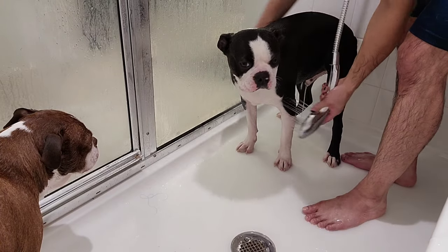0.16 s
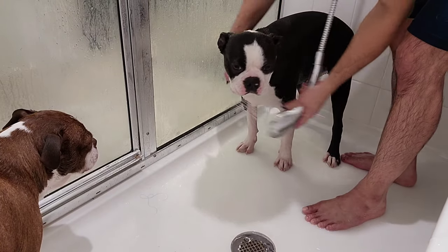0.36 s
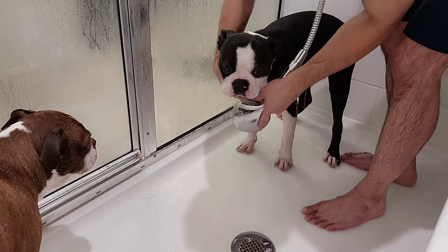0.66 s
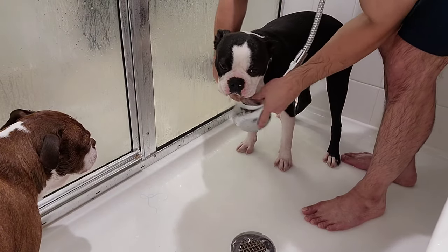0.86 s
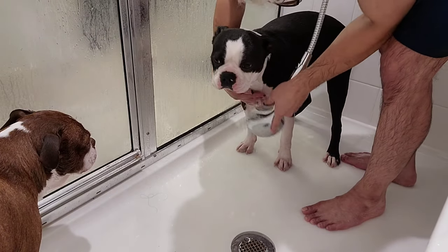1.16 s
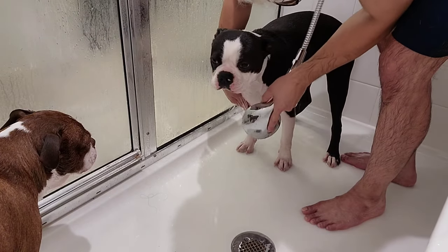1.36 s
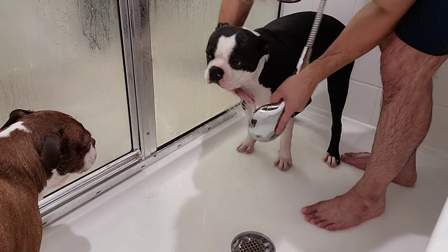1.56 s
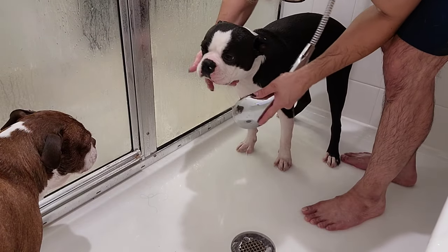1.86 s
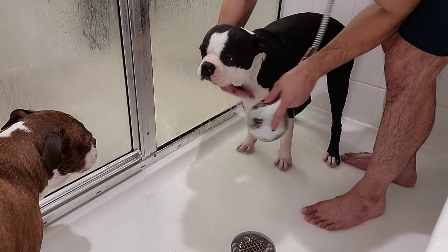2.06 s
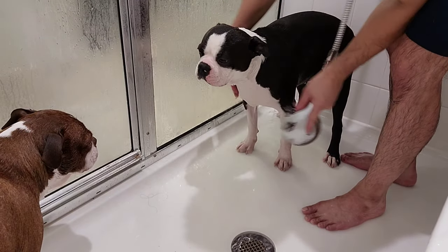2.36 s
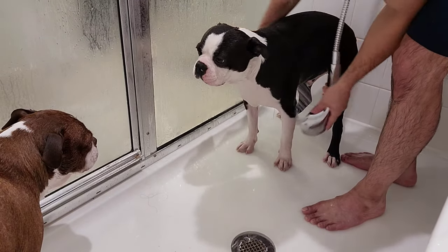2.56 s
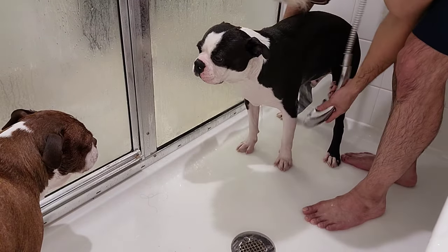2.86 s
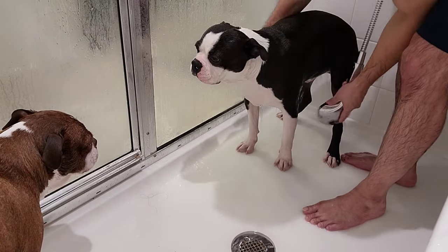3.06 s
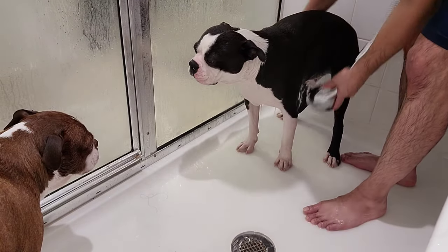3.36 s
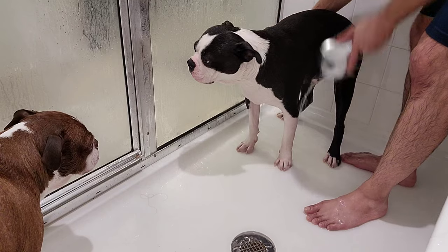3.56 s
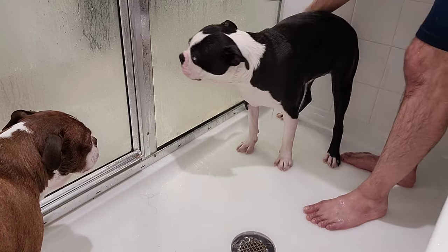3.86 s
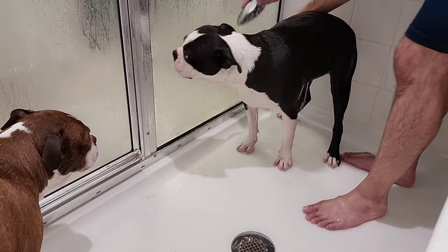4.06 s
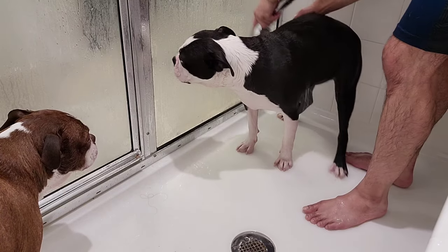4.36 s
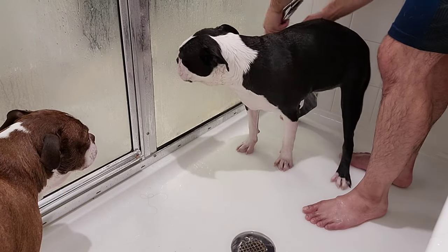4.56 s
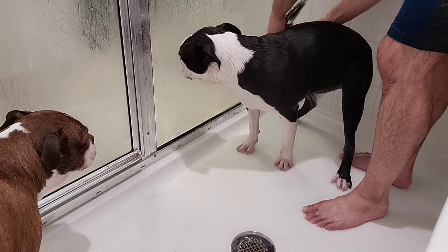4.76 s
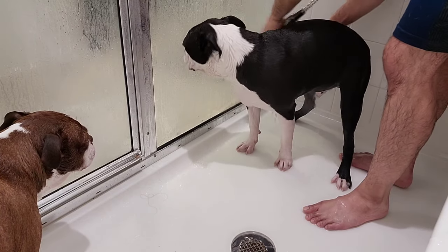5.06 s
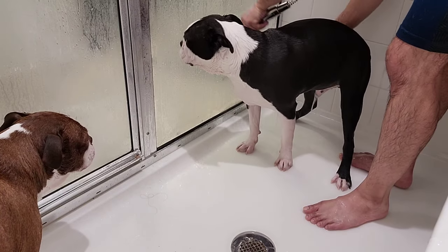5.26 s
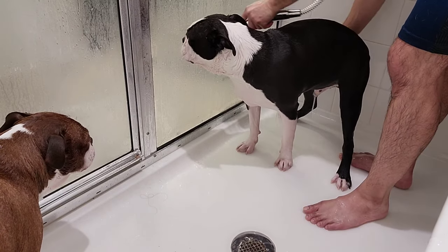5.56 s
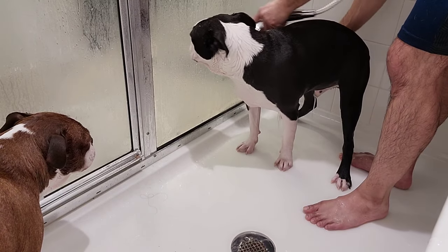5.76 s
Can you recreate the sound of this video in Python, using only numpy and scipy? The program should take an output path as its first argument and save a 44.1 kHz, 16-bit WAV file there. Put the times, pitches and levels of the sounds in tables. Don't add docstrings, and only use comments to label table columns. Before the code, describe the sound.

In a small tiled shower stall, a hand shower hisses continuously and splashes on a dog's coat, its tone shifting as it moves. Early gushes gurgle and ring at the drain. Midway, paws thud on the hollow tray; near the end a hard knock booms and rattles the door frame. Close stereo pickup, wide airy treble.

```python
import sys
import numpy as np
from scipy import signal
from scipy.io import wavfile
from scipy.ndimage import uniform_filter1d

SR = 44100
rng = np.random.default_rng(int(sys.argv[2]) if len(sys.argv) > 2 else 0)


def bounce(signal):
    frames = np.transpose(np.atleast_2d(signal))
    limited = np.clip(frames, -1, 1)
    pcm = np.round(limited * 32767).astype(np.int16)
    wavfile.write(sys.argv[1], SR, pcm)


def undo_db(level):
    steps = np.asarray(level, float) / 20
    return 10 ** steps


N = 261292

LEFT_DB, LEFT_BASS_DB = 1.3, 2.2
RIGHT_LAG_S = -.0001
STALL_T60_S, SHARED_BELOW_HZ = .34, 215


def rms_one(x):
    return x / np.sqrt(np.mean(x ** 2) + 1e-20)


def in_time(rows):
    s, *columns = np.transpose(rows)
    return [np.interp(np.arange(N) / SR, s, c) for c in columns]


def swells(rows):
    s, half_s = np.array(rows)[:, :2].T[..., None]
    t = np.arange(0, N, 32) / SR
    return np.cos(np.pi / 2 * np.clip((t - s) / half_s, -1, 1)) ** 2


def summed(rows, column):
    total = np.asarray(column) @ swells(rows)
    return np.interp(np.arange(N) / 32, np.arange(len(total)), total)


def drift(rate_hz):
    r = np.exp(-80 * np.pi * rate_hz / SR)
    noise = rng.standard_normal(N // 40 + 2002)
    slow = signal.lfilter([1], [1, -2 * r, r * r], noise)[2000:]
    return np.interp(np.arange(N) / 40, np.arange(len(slow)), rms_one(slow))


def resonate(x, hz, width_hz):
    r = np.exp(-np.pi * width_hz / SR)
    poles = [1, -2 * r * np.cos(2 * np.pi * hz / SR), r * r]
    return signal.lfilter([(1 - r * r) / 2, 0, (r * r - 1) / 2], poles, x + 1e-18)


def body(x, modes):
    out = 0
    for k, (hz, width_hz, db) in enumerate(modes):
        out = out + (-1) ** k * undo_db(db) * resonate(x, hz, width_hz)
    return out


def ring(clicks, hz, t60):
    r, w = undo_db(-60 / (t60 * SR)), 2 * np.pi * hz / SR
    return signal.lfilter([0, np.sin(w)], [1, -2 * r * np.cos(w), r * r], clicks + 1e-18)


def soften(x, cut_hz):
    r = np.exp(-2 * np.pi * cut_hz / SR)
    return signal.lfilter([(1 - r) ** 2], [1, -2 * r, r * r], x)


def droplets(per_s, spread_db, channels=1):
    size_db = spread_db * np.minimum(rng.exponential(1, (channels, N)), 5)
    sizes = undo_db(size_db) * rng.choice([-1, 1], (channels, N))
    return rms_one(sizes * (rng.random((channels, N)) < per_s / SR))


def burst(s, length_s, rise_s):
    t = np.arange(8000) / SR
    envelope = (1 - np.exp(-t / rise_s)) * np.exp(-t / length_s)
    return round(s * SR), rng.standard_normal(len(t)) * envelope


def add(track, at, sound):
    track[at:at + len(sound)] += sound[:N - at]


def echoes(x):
    t = np.arange(SR // 2) / SR
    tail = rng.standard_normal((2, len(t))) * undo_db(-60 * t / STALL_T60_S) * (t > .002)
    tail = signal.sosfilt(signal.butter(5, SHARED_BELOW_HZ, "high", fs=SR, output="sos"), tail)
    tail /= np.sqrt(np.sum(tail ** 2, axis=1, keepdims=True))
    return signal.fftconvolve(x[None], tail, axes=1)[:, :N]


def stall(x, wet_db, place=0):
    bass = signal.sosfilt(signal.butter(4, SHARED_BELOW_HZ, fs=SR, output="sos"), x)
    bass = bass * undo_db(np.array([[LEFT_BASS_DB - LEFT_DB], [LEFT_DB - LEFT_BASS_DB]]) / 2)
    treble = signal.sosfilt(signal.butter(4, SHARED_BELOW_HZ, "high", fs=SR, output="sos"), x)
    treble = np.array([treble, np.roll(treble, round(RIGHT_LAG_S * SR))])
    wet = echoes(x * np.cos(place))
    if np.any(place):
        wet = wet + echoes(x * np.sin(place))
    return bass + (treble + undo_db(wet_db) * wet) / np.sqrt(1 + undo_db(2 * wet_db))


# pitch_hz, width_hz, level_db
TRAY_MODES = [(38, 8.9, 0.5), (70, 13, 1.5), (135, 45, 0.5), (209.1, 13.4, 2.5), (275.7, 39.5, 1),
              (207, 17, -9), (364, 8, -4.5)]


def drumming():
    level_db = -55 + 4.0 + 1.0 * drift(25.0)
    return rms_one(body(droplets(900, spread_db=3.0)[0], TRAY_MODES)) * undo_db(level_db)


# pitch_hz, width_hz, level_db
FILM_MODES = [(378.5, 8.4, 0), (504, 64, -19), (746, 150, -4.5), (952, 21, 0), (1075, 290, -7)]
# peak_s, half_length_s, gurgle_lift_db, drain_lift_db
GUSHES = [(0.18, 0.3, 3.5, 6.5), (0.422, 0.15, 11.5, 16), (0.633, 0.2, 7, 21.5), (0.827, 0.03, 7, 12),
          (1.004, 0.032, -2, 18), (2.003, 0.056, 5.5, 15), (2.44, 0.087, 2, 9), (2.742, 0.33, 3.5, 8),
          (3.855, 0.097, 1, 15), (4.224, 0.037, 9.5, -13), (4.44, 0.22, 9, 5), (5.805, 0.23, 6, -4.5)]
GURGLE_DB, DRAIN_DB = -60.5, -70.5


def runoff():
    gurgle_lift_db, drain_lift_db = np.array(GUSHES)[:, 2:].T
    gurgle_db = GURGLE_DB + summed(GUSHES, gurgle_lift_db) + 3.5 + 1.2 * drift(9.6)
    drain_db = DRAIN_DB + summed(GUSHES, drain_lift_db) + 1.5
    gurgle = rms_one(body(droplets(1200, spread_db=4.0)[0], FILM_MODES)) * undo_db(gurgle_db)
    drain = resonate(resonate(droplets(800, spread_db=5.5)[0], 582, 17), 553, 8.7)
    drain = drain / np.sqrt(uniform_filter1d(drain ** 2, size=2500) + 1e-20)
    return gurgle, drain * undo_db(drain_db)


# start_s, length_s, level_db, pitch_hz
AIR_POCKETS = [(.41, 0.016, -39, 1120), (0.443, .04, -43, 2930), (0.549, 0.114, -41, 1417),
               (0.582, 0.06, -46, 1130), (.65, 0.042, -53, 2170), (.69, 0.047, -46, 2330),
               (.73, 0.15, -50, 2760), (1.06, 0.015, -51, 2410), (1.347, 0.077, -40.5, 2690),
               (1.905, 0.13, -48, 2250), (3.845, 0.017, -43, 1740), (4.238, 0.059, -47, 1420)]


def pockets():
    out = np.zeros(N)
    for s, length_s, db, hz in AIR_POCKETS:
        breath = resonate(rng.standard_normal(8000), hz, 0.079 * hz)
        hum = rms_one(resonate(breath, hz, 0.079 * hz))
        t = np.arange(len(hum)) / SR
        envelope = np.sqrt(np.sin(np.pi * np.clip(t / length_s, 0, 1)).clip(0))
        add(out, round(s * SR), undo_db(db - 4.0) * hum * envelope)
    return out


# start_s, peak_db, centre_hz
FAT_DROPS = [(0.413, -30, 9200), (0.596, -35, 11500), (0.757, -24.5, 12200), (1.0415, -33, 9100),
             (1.6132, -56, 12300), (1.8228, -29.5, 10500), (1.9535, -29.5, 8700), (2.2932, -25.5, 8890),
             (2.415, -23.5, 9600), (4.265, -27, 9450), (4.8005, -30, 12500), (5.097, -46, 11900),
             (5.2, -31, 9600), (5.368, -29, 9700), (5.504, -27.5, 9500), (5.6291, -29, 11900)]


def spats():
    out = np.zeros(N)
    for s, db, hz in FAT_DROPS:
        at, crack = burst(s, .0012, .0002)
        _, fizz = burst(s, 0.0075, 0.00031)
        add(out, at, undo_db(db - 0.5) * resonate(crack + 0.73 * fizz, hz, 0.73 * hz))
    return out


# start_s, pad_db, contact_s, claw_db, claw_hz
PAW_STEPS = [(1.07, -38.5, 0.0086, -35, 2610), (3.64, -28.5, 0.021, -36.5, 1110),
             (3.642, -60, 0.034, -51.5, 3000), (3.661, -19.5, 0.0047, -39, 950),
             (3.684, -28, 0.015, -48, 885), (3.707, -113, 0.051, -48, 785), (3.844, -32.5, 0.043, -46, 650),
             (3.922, -34.5, 0.008, -63, 690), (4.009, -38, 0.054, -64, 496),
             (4.099, -42.5, 0.0085, -62, 500), (4.337, -41, 0.11, -87, 704), (4.457, -45, 0.1, -78, 700),
             (4.546, -39, 0.026, -49, 700), (4.609, -37.5, 0.044, -60, 590),
             (5.502, -43, 0.031, -42.5, 490), (5.548, -56, 0.065, -52, 500)]
# start_s, level_db, pitch_hz, t60_s
WEIGHT_SHIFTS = [(1.07, -40, 150, 0.44), (1.458, -42, 116, 0.21), (3.652, -32.5, 67, 0.2),
                 (3.659, -29, 36.8, 0.3), (3.851, -30, 130, 0.2), (4.014, -32.5, 95, .3),
                 (4.08, -35, 66.7, 0.27), (4.342, -33.5, 135, 0.37), (4.432, -40, 121, 0.22),
                 (4.559, -31.5, 132, 0.11), (4.617, -35, 70, 0.068), (5.505, -38, 45.3, 0.22),
                 (5.55, -32, 38, 0.38), (5.556, -30.5, 139, 0.14)]


def paws():
    pads, claws, bend = np.zeros((3, N))
    for s, pad_db, contact_s, claw_db, claw_hz in PAW_STEPS:
        at, shake = burst(s, contact_s, 0.00031)
        add(pads, at, undo_db(pad_db + 20) * shake)
        at, scratch = burst(s, contact_s * 0.77, 0.00023)
        scratch = resonate(scratch, claw_hz, 0.89 * claw_hz)
        add(claws, at, undo_db(claw_db + 19) * resonate(scratch, claw_hz, 0.89 * claw_hz))
    for s, db, hz, t60 in WEIGHT_SHIFTS:
        add(bend, round(s * SR), undo_db(db) * ring(signal.unit_impulse(SR // 2), hz, t60))
    thud = body(pads, TRAY_MODES[3:]) + undo_db(-9) * body(pads, FILM_MODES[:3])
    return thud + claws + soften(bend, 170)


# start_s, panel_db, frame_db, way (push +1 or pull -1)
BLOWS = [
    (5.355, -22, -68, 1),
    (5.36, -37, -38, -1),
    (5.3665, -5.5, -22.5, 1),
    (5.387, -24.5, -29, 1),
    (5.41, -19, -63, 1),
    (5.441, -21.5, -44, 1),
    (5.476, -22, -43.5, 1),
]
# pitch_hz, level_db, t60_s
PANEL_MODES = [(38, -32, 0.46), (70.8, -19, 0.6), (95, 0.5, 0.069), (124.9, -2.5, 0.6), (163, -21, 0.3),
               (204, -15, 0.43), (283, -13, 0.102), (415, -7, 0.13), (496, 4, 0.095), (537, -4, 0.059)]
# pitch_hz, level_db, t60_s
FRAME_MODES = [(1553, -1, .04), (1621, -4, .03), (1815, -1, .025), (2015, 1, .03), (2237, 0, .03),
               (2347, -1, .03), (2495, 0, .025), (2880, 3, .035), (3250, 0, .025)]


def knock():
    blows, chatter = np.zeros((2, N))
    for s, panel_db, frame_db, way in BLOWS:
        at, rattle = burst(s, .016, .0005)
        blows[at + round(.002 * SR)] = np.sign(way) * undo_db(panel_db - 5.5)
        add(chatter, at, undo_db(frame_db) * rattle)
    panel = sum(undo_db(db) * ring(blows, hz, t60) for hz, db, t60 in PANEL_MODES)
    modes = sum(undo_db(db - 21) * ring(chatter, hz, min(t60, .06)) for hz, db, t60 in FRAME_MODES)
    thin_metal = signal.butter(3, [1500, 3700], "band", fs=SR, output="sos")
    frame = signal.sosfilt(thin_metal, modes + undo_db(10) * chatter)
    frame = frame + undo_db(1.5) * resonate(chatter, 3400, 4000)
    frame = frame + undo_db(8) * resonate(chatter, 1000, 500)
    return soften(panel, 250), frame


# peak_s, half_length_s, splash_db, gap_coming_hz, gap_going_hz
FUR_PASSES = [(0.228, 0.33, -47.5, 4300, 3500), (0.452, 0.12, -45, 3220, 2750),
              (0.664, 0.19, -43, 1950, 2360), (0.963, 0.13, -43.5, 2750, 2300),
              (1.085, 0.11, -39.5, 2720, 3300), (1.378, 0.26, -46, 3030, 3000),
              (1.578, 0.15, -50, 2560, 1970), (1.9, 0.27, -45.5, 2830, 2530),
              (2.26, 0.18, -56.5, 3120, 3000), (2.47, 0.061, -53, 3000, 3300),
              (2.737, 0.25, -63.5, 3120, 2600), (3.307, 0.2, -53, 3900, 3400),
              (3.49, 0.11, -53, 3700, 3600), (4.14, 0.2, -46, 3860, 2750), (4.36, 0.27, -47, 3040, 2550),
              (5.3, 0.18, -53, 3160, 3600), (5.683, 0.73, -55.5, 3100, 2450)]
FAR_SPLASH_DB = -58
GAP_SPREAD = .2


def splash():
    s, half_s, peak_db, coming_hz, going_hz = np.transpose(FUR_PASSES)
    level = undo_db(FAR_SPLASH_DB) + summed(FUR_PASSES, undo_db(peak_db))
    coming, going = zip(s - half_s / 2, coming_hz), zip(s + half_s / 2, going_hz)
    gap_hz, = in_time(sorted([*coming, *going]))
    drops, out = droplets(5000, spread_db=3.5)[0], np.zeros(N)
    for hz in np.geomspace(1000, 5500, 12):
        near = np.exp(-(np.log(gap_hz / hz) / GAP_SPREAD) ** 2)
        patchy = undo_db(1.8 * drift(17))
        out += near * resonate(drops, hz, 0.21 * hz) / np.sqrt(hz) * patchy
    even = np.sqrt(uniform_filter1d(out ** 2, 6000) + 1e-20)
    return undo_db(1.5) * level * out / even


# pitch_hz, level_db (per Hz)
HISS_COLOUR = [(1500, 2), (2000, -6), (2600, -3), (3380, 0.5), (7900, 0), (9330, 1.5), (11500, 2.5),
               (15500, 0)]
# time_s, hiss_db
HEAD_AIM = [(0, -46), (.45, -49.5), (.68, -50.5), (.9, -53.5), (1.07, -47.5), (1.3, -50.5), (1.8, -51),
            (2.14, -52), (2.45, -48), (2.62, -52.5), (3.0, -51.5), (3.45, -52), (3.58, -54), (3.8, -55.5),
            (4.35, -48.5), (4.74, -53.5), (5.0, -51), (5.92, -51)]
# peak_s, half_length_s, mist_lift_db, spray_lift_db
GLANCES = [(.14, 0.033, -1, 5), (0.77, 0.036, 1, -3), (1.083, 0.066, 1.5, 4), (1.902, 0.081, -1, 4.5),
           (1.966, 0.041, 5.5, 2), (2.267, 0.092, 1, 1.5), (2.892, .1, 4, 4), (3.114, .06, 4.5, -1),
           (3.444, 0.092, 3.5, 1), (4.054, 0.13, 0.7, 3), (4.28, 0.04, 1.5, -5), (4.654, 0.043, 2, 2.5),
           (4.834, 0.064, 3, 1.5), (5.396, 0.065, -5, 12), (5.607, 0.088, 1.5, 4)]
SPRAY_DB, SPRAY_FOLLOWS, MIST_DB = -53, 0.93, 0.96
TOGETHER_DB, OWN_DB = .65, .9


def jets():
    aim_db, = in_time(HEAD_AIM)
    mist_lift_db, spray_lift_db = np.array(GLANCES)[:, 2:].T
    mist_db = aim_db + MIST_DB + summed(GLANCES, mist_lift_db)
    spray_db = SPRAY_DB + SPRAY_FOLLOWS * (aim_db - aim_db.mean()) + summed(GLANCES, spray_lift_db)
    edges, together = 1370 * 2 ** np.arange(0, 4, 1 / 3), drift(9)
    drops = [droplets(14000, spread_db=2.0, channels=2) for k in range(2)]
    colour_hz, colour_db = np.transpose(HISS_COLOUR)
    spray, mist = np.zeros((2, 2, N))
    for k, (low, high) in enumerate(zip(edges, edges[1:])):
        band = signal.sosfilt(signal.butter(3, [low, high], "band", fs=SR, output="sos"), drops[k % 2])
        level_db = np.interp(np.log(low * high) / 2, np.log(colour_hz), colour_db)
        layer = mist if low > 8000 else spray
        layer += band * undo_db(level_db + TOGETHER_DB * together + OWN_DB * drift(5.9))
    return undo_db(spray_db + 3.0) * rms_one(spray) + undo_db(mist_db + 4.5) * rms_one(mist)


def scene():
    gurgle, drain = runoff()
    tray = stall(paws() + drumming() + drain + pockets(), wet_db=1.0)
    panel, frame = knock()
    door = stall(panel, wet_db=3) + stall(frame, wet_db=-2)
    water = stall(splash() + gurgle, wet_db=6.5, place=2.43 * drift(0.59))
    return jets() + water + tray + door + stall(spats(), wet_db=1.0)


def roll_off(x):
    return signal.sosfilt(signal.butter(12, 16850, fs=SR, output="sos"), x)


def record(dry):
    pair = dry * undo_db(np.array([[LEFT_DB], [-LEFT_DB]]) / 2)
    pair = signal.sosfilt(signal.butter(2, 22, "high", fs=SR, output="sos"), pair)
    pair = pair + 0.38 * resonate(pair, 9360, 790)
    pair = signal.sosfilt(signal.ellip(14, .5, 90, 15600, fs=SR, output="sos"), pair)
    return roll_off(pair)


dry = scene()
out = record(dry)
bounce(out)
```